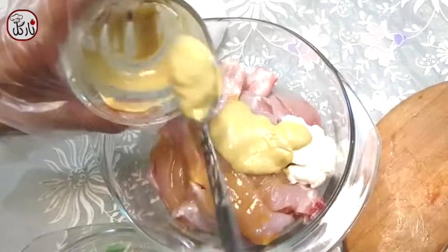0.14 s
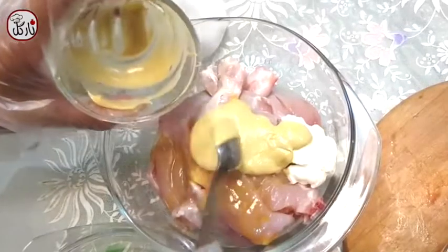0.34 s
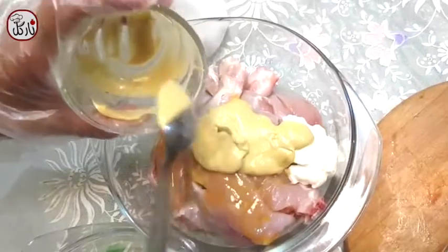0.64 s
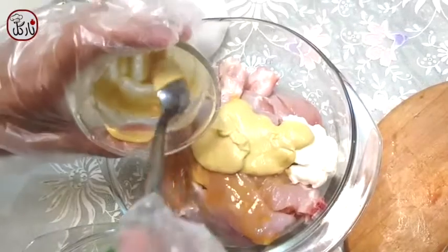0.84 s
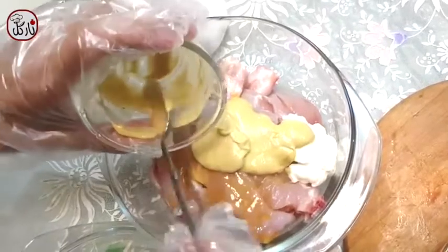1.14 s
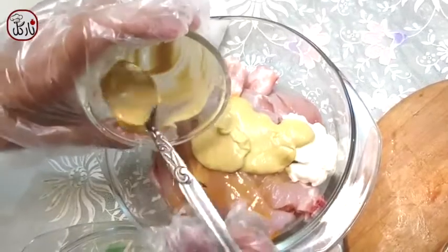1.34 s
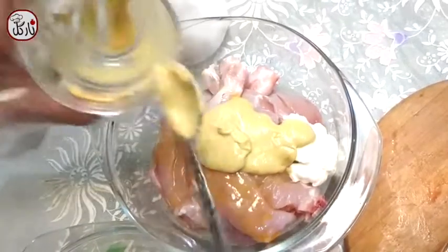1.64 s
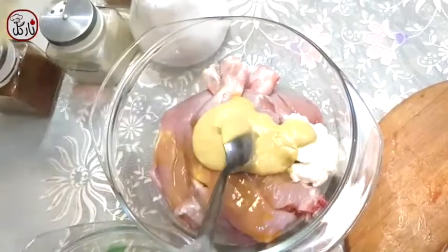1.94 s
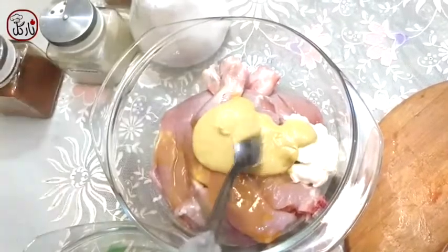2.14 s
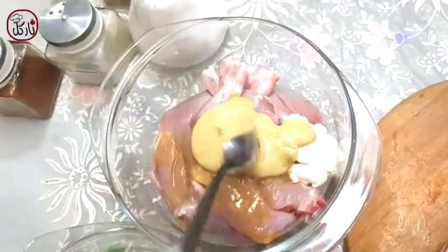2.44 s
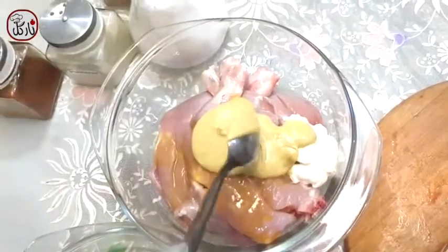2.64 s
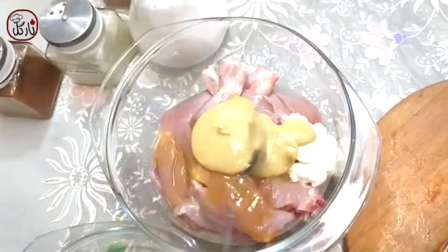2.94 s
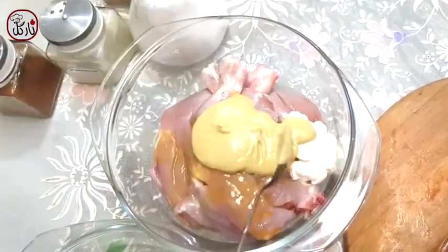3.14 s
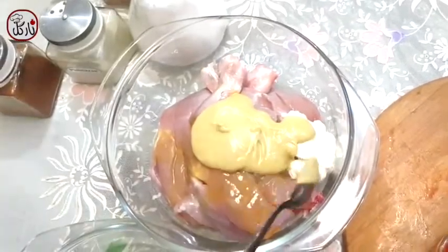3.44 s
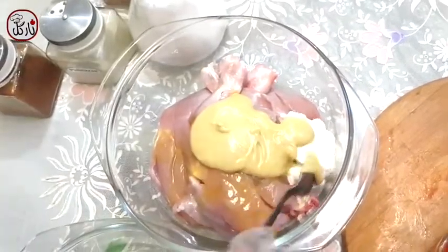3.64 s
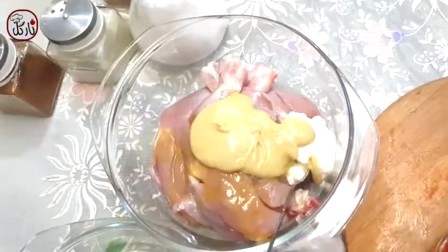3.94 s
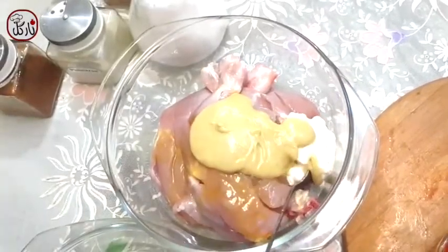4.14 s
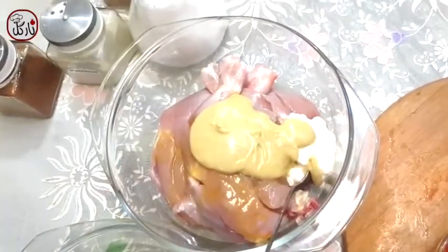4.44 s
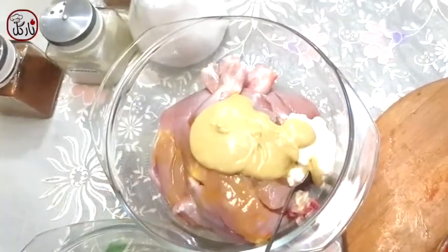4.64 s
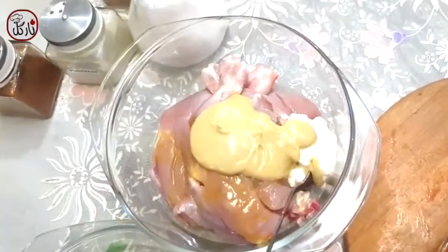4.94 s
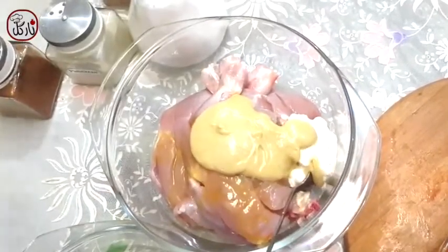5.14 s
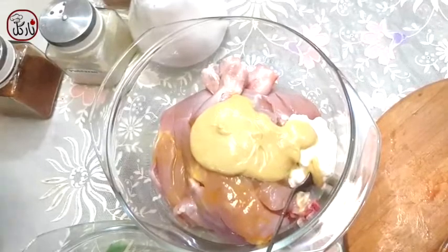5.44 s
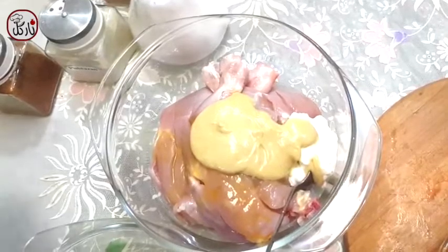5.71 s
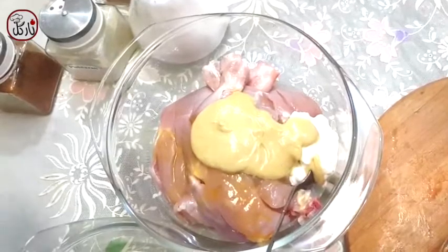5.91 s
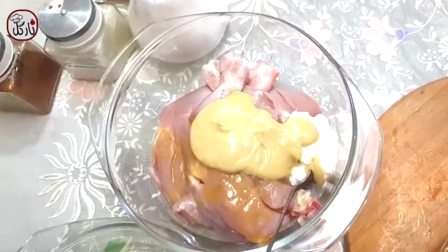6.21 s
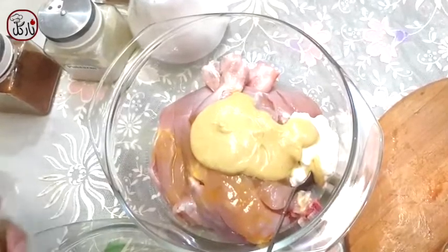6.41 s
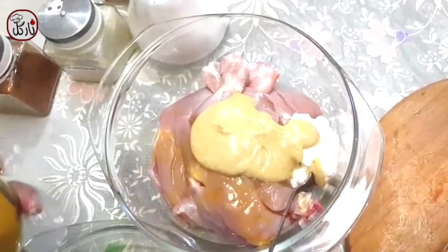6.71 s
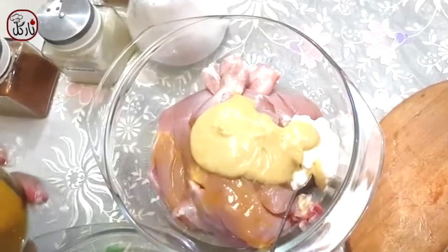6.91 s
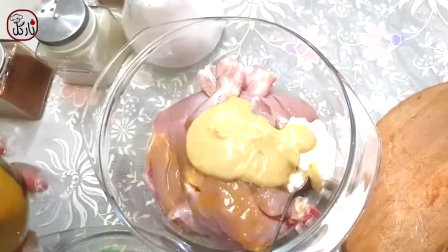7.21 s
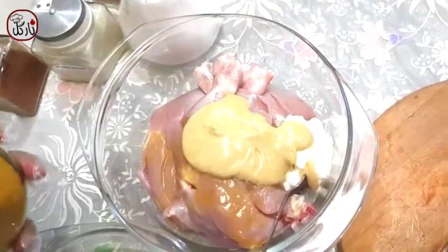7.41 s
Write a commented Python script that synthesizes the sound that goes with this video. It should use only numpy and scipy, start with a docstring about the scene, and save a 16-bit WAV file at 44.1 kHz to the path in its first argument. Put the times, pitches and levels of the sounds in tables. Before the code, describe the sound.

Thin plastic gloves crinkle and snap close up while a spoon scrapes a small glass cup and taps a bowl over faint kitchen hum.

```python
"""At a kitchen table, thin plastic gloves crinkle just above a phone: many tiny bursts of noise and louder snaps.
A spoon scrapes a small glass cup (uneven noise) and drops against the rim of a big bowl (ringing tones).
Glassware is set down with soft thuds and rattles. An appliance hums in the room: tones, low noise and faint air.
The phone's two ports hear differently: the left bright and early, the right dull, resonant and late."""
import sys
import numpy as np
from scipy import signal
from scipy.fft import rfft, irfft
from scipy.io import wavfile
from scipy.ndimage import uniform_filter1d

SR = 44100
rng = np.random.default_rng(int(sys.argv[2]) if len(sys.argv) > 2 else 0)


def store_wav(level_fs):
    """Save 16-bit WAV to argv[1]."""
    pcm = np.round(np.clip(np.atleast_2d(level_fs), -1, 1) * 32767)
    wavfile.write(sys.argv[1], SR, pcm.T.astype(np.int16))


N = 333652  # length in samples

# Single creases snapping. Each row: time in seconds, relative level in dB.
CREASE_SNAPS = [(0.093, -27), (0.15, -22), (0.259, -22.5), (0.488, -25), (0.916, -19), (0.946, -22),
                (0.982, -28), (1.162, -24), (1.18, -22.5), (1.211, -24), (1.254, -26), (1.5, -30),
                (1.874, -34), (1.923, -30), (2.245, -23.5), (2.288, -32), (2.312, -26), (2.356, -34),
                (2.441, -29), (2.845, -22), (2.934, -35), (2.951, -30), (2.975, -17), (2.982, -21),
                (3.155, -27), (3.182, -28.5), (3.288, -25), (3.471, -20.5), (3.48, -22), (3.508, -19.5),
                (3.619, -20.5), (3.964, -17), (4.055, -20.5), (4.192, -31), (4.249, -24), (4.338, -29),
                (4.599, -28.5), (4.964, -32), (5.011, -32), (5.103, -26.5), (5.16, -26), (5.174, -19.5),
                (5.207, -20), (5.228, -21), (5.292, -19), (5.387, -16), (5.452, -19), (5.457, -19),
                (5.478, -34.5), (5.597, -18), (5.886, -17), (5.923, -24), (6.108, -20), (6.339, -17),
                (6.369, -30), (6.442, -22), (6.501, -22.5), (6.815, -31), (6.917, -28), (7, -23),
                (7.33, -24.5), (7.5, -20), (7.52, -17)]
# Frequency bands of the plastic film. Each row: centre in Hz, relative level in dB.
FILM_BANDS = [(900, -12), (1600, -10), (2250, 0), (3300, 0.5), (4700, 7), (6600, 2.5), (9000, 5.5),
              (11800, 3), (14500, -1)]
# Hand movements that crumple the film. Each row: peak time in seconds, rise in seconds, fall in seconds,
# relative peak level in dB, lower bands against the top in dB.
HAND_MOVES = [(0.0, 0.12, 0.047, -49.5, -20), (0.243, 0.14, 0.044, -40, -8), (.5, 0.076, 0.069, -56, -13),
              (.77, 0.043, 0.045, -65, -12), (.9, 0.028, 0.069, -51, -3), (1.099, 0.12, 0.11, -44.5, -5),
              (1.286, 0.08, 0.083, -47.5, -8), (1.604, .11, 0.17, -39.5, -5),
              (1.939, 0.28, 0.034, -44.5, -5.5), (2.088, 0.23, 0.088, -45, -5),
              (2.331, 0.09, 0.023, -59.5, -2.5), (2.53, 0.018, 0.022, -55.5, -4),
              (2.617, 0.045, 0.24, -51, 2), (2.891, 0.13, 0.094, -44, -7), (3.17, 0.018, 0.064, -56, -0.5),
              (3.3, 0.11, 0.052, -67, 3.5), (3.42, 0.12, 0.01, -58, -34), (3.521, 0.036, 0.089, -47, -11),
              (3.688, 0.056, 0.055, -43.5, -1.5), (3.97, 0.19, 0.081, -38, -8),
              (4.253, 0.028, 0.064, -48, -4), (4.394, .1, 0.069, -47.5, -3), (4.472, 0.05, 0.1, -45.5, 0),
              (4.587, 0.043, 0.057, -52.5, 1), (4.96, 0.03, 0.019, -54, -9), (5.029, 0.032, 0.21, -63, -5),
              (5.211, 0.054, 0.06, -48.5, -9.5), (5.361, 0.067, 0.13, -40.5, -11.5),
              (5.467, 0.018, 0.098, -35, -7), (5.749, 0.23, 0.1, -40, -7),
              (5.91, 0.055, 0.17, -37.5, -10.5), (6.118, 0.47, 0.21, -39, -8),
              (6.36, 0.03, 0.043, -37.5, -8.5), (6.51, 0.043, 0.05, -43.5, -11),
              (6.65, 0.11, 0.13, -51, -5), (6.991, 0.084, 0.022, -39.5, -7.5),
              (7.029, 0.034, 0.065, -48, -3.5), (7.222, 0.038, 0.025, -42.5, -22),
              (7.332, 0.076, 0.13, -54.5, -8), (7.51, 0.053, 0.016, -54.5, -16)]
# Faint rustle between movements. Each row: time in seconds, relative level in dB, lower bands against top in dB.
IDLE_RUSTLE = [(0, -51, -21), (.6, -76.5, 1), (.85, -92, -11), (1.45, -58, -6.5), (2.4, -69.5, 0.5),
               (3.1, -62, -2.5), (4.15, -62, -7), (4.702, -58.5, 0), (4.9, -69, 6), (6.26, -55.5, -22),
               (6.325, -62, -5), (6.4, -50, -4.5), (6.85, -62, -4), (7.56, -69, -1)]
# Extra level of the film bands below BODY_TOP_HZ. Each row: time in seconds, level in dB.
BODY_LEVEL = [(0, -4), (.6, 3), (2.0, -2), (2.4, -12.5), (2.8, 0.5), (4.0, 3.5), (4.7, 0.5), (5.2, 2.5),
              (5.7, 1.5), (6.7, 4.5), (7.0, 2), (7.3, 8), (7.56, 3.5)]
# Small narrow ticks. Each row: time in seconds, relative level in dB, pitch in Hz.
SMALL_TICKS = [(0.4707, -46.5, 4840), (0.5751, -45.5, 5020), (.916, -23, 6380), (1.2286, -50, 5200),
               (1.464, -47, 4700), (1.865, -51.5, 2080), (2.95, -40, 5100), (3.154, -48.5, 4670),
               (3.304, -43.5, 5650), (3.5294, -45, 5000), (3.586, -36.5, 5770), (5.774, -35, 4800),
               (6.262, -33, 5160), (6.984, -41, 2330), (6.997, -37.5, 3570), (7.19, -34.5, 7200),
               (7.231, -40, 6440)]
# Spoon strokes on the cup. Each row: time in seconds, relative level in dB,
# time to fall 60 dB in seconds, treble tilt in dB per octave.
SPOON_SCRAPES = [(0.873, -56.5, 0.66, 11), (0.912, -45, 0.062, -3), (1.0214, -41, 0.16, -1),
                 (1.1118, -42, 0.04, 4), (1.261, -36, 0.036, 6), (1.267, -55, 0.19, 1),
                 (3.663, -41.5, 0.12, 3), (3.688, -45, 0.035, -6.5)]
# Resonances of the glass cup. Each row: centre in Hz, width in Hz, relative level in dB.
CUP_BANDS = [(1690, 600, 2), (2160, 200, 5), (3130, 370, 4), (4480, 780, 3.5), (6550, 690, -3.5)]
# Spoon blows on the bowl. Each row: time in seconds, relative level in dB.
BOWL_BLOWS = [(3.7103, -21.5)]
# Ringing tones of the bowl. Each row: pitch in Hz, relative level in dB, time to fall 60 dB in seconds.
BOWL_MODES = [(880, -7, 0.08), (1370, 2, 0.05), (1758, 5.5, 0.13), (2040, -4, 0.15), (2244, -0.5, 0.08),
              (3217, 9.5, 0.058), (3330, 7, 0.039), (3370, -4, 0.032), (4770, 2, 0.067), (4800, -6, 0.16),
              (4050, -8, 0.04), (6994, 3.5, 0.035)]
# Glass set down. Each row: time in seconds, relative level in dB, hardness from 0 to 1.
GLASS_KNOCKS = [(2.735, -27.5, 0.08), (3.688, -38, 0.13), (3.708, -44, 0.05), (5.471, -47.5, 0.27),
                (5.998, -47.5, 0.68), (6.336, -52.5, 0.74), (6.979, -48.5, 0.78), (7.368, -45.5, 0.18)]
# Ringing tones of the table. Each row: pitch in Hz, relative level in dB, time to fall 60 dB in seconds.
TABLE_MODES = [(373, 5, 0.018), (527, -13, 0.13), (287, -13, 0.096), (964, -7.5, 0.03)]
# Noise bands of the hum. Each row: centre in Hz, width in Hz, relative level in dB.
HUM_BANDS = [(120.9, 5.6, -7.5), (191, 56, -6.5), (277, 59, -6)]
# Slow level of the hum. Each row: time in seconds, level in dB.
HUM_LEVEL = [(0, -61.5), (3, -65.5), (6.2, -65), (7.57, -71.5)]
# A wandering drone. Each row: time in seconds, centre pitch in Hz, level in dB.
DRONE_PATH = [(0, 141.4, -63), (.7, 160.2, -60.5), (1.5, 137.5, -65.5), (2.8, 149.2, -61.5),
              (4.0, 155.7, -66), (5.7, 151.9, -64.5), (7.56, 140, -72.5)]
# Colour of the air noise. Each row: frequency in Hz, relative level in dB.
AIR_COLOUR = [(25, -19), (60, -6), (300, -3.5), (500, -10), (800, -24.5), (2000, -25), (6000, -68),
              (16000, -49)]
# Colour of each phone port. Each row: frequency in Hz, gain in dB.
LEFT_COLOUR = [(200, -2), (1200, 4.5), (2200, 1), (3000, 2.5), (5500, 2), (6800, 1), (8000, -6),
               (11500, 6.5), (13500, 6.5), (15500, 9)]
RIGHT_COLOUR = [(200, -3.5), (700, -2), (1400, 2.5), (2200, 6), (3000, -6), (4800, 6.5), (5200, -5.5),
                (6000, -15), (8000, -13), (12000, -7.5), (15500, -19.5)]

BODY_TOP_HZ, LOW_TOP_HZ = 3000, 6000  # tops of the film's body bands and of its lower bands
EDGE_DB, LOW_EDGE_DB = 14, 13  # drop one rise before or one fall after a peak: top and lower bands
ROUNDNESS = 2.31  # power of that slope
TICK_CYCLES, TICK_WIDTH = 93, 0.21  # cycles to fall 60 dB; band width as a share of the pitch
AIR_DB = -63
STEADY_HZ, STEADY_DB = 99, -73.5
DRONE_WIDTH_HZ = 18.4
PORT_LAG_S = 0.0003
ROOM_T60_S, ROOM_DB = .22, -15
TOP_HZ = 15900  # hardly anything passes above this


def gloves():
    """Creases buckle at random, more often the harder the hand moves; each pop is a short burst with its own colour."""
    time = np.arange(N) / SR
    coarse = time[::100]
    level_db, low_db = (np.interp(time, coarse, db) for db in effort(coarse))
    rate = np.clip(1600 * undb(0.54 * (level_db + 49.0)), 1050, 8000)  # pops a second
    pops = np.flatnonzero(rng.random(N) < rate / SR)
    size = undb(np.minimum(2.0 * rng.exponential(size=N), 9))[pops]
    # quieter pops where they crowd together, so the rate alone does not raise the level
    evening = np.sqrt(np.mean(rate) / rate[pops]) / np.sqrt(np.mean(size ** 2))
    body_db = np.interp(time, *np.transpose(BODY_LEVEL))
    snap_s, snap_db = np.transpose(CREASE_SNAPS)
    snap_low_db = np.interp(snap_s, time, low_db) - 30
    tint = rng.standard_normal((len(snap_s), len(FILM_BANDS)))  # each snap has its own colour
    out = 0
    for k, (hz, db) in enumerate(FILM_BANDS):
        low, body = hz < LOW_TOP_HZ, hz < BODY_TOP_HZ
        pop_tint_db = (4.5 if low else 6.5) * np.minimum(rng.standard_normal(N)[pops], 2)
        pop_size = size ** (1 if low else 1.6) * undb(pop_tint_db) * evening
        # bursts add as power: 9 ms is the time for the power to fall to a thousandth
        burst_power = swell(spikes(pops / SR, pop_size ** 2), .0005, .009)
        # other folds take over many times a second, so the colour keeps changing
        gain = undb(level_db + low * low_db + body * body_db + 3.27 * drift(30) - 4.0)
        crackle = unit(np.sqrt(np.abs(burst_power))) * gain
        crisp = spikes(pops / SR, pop_size)
        band_snap_db = snap_db + low * snap_low_db + 4.0 * tint[:, k] - 5.0 * (hz < 8000) - 13.0
        snap = spikes(snap_s, undb(band_snap_db))
        # the instant of buckling: bare spikes of random sign
        instant = undb(16.0) * snap + undb(10.0 - 8.6 * low) * crisp * gain
        flick = pair(instant) * np.sign(rng.standard_normal((2, N)))
        width = np.clip((0.36 if body else 0.51) * hz, 480, 3000)
        film = grit(hz, 2900) * (crackle + swell(snap, 0.0021, 0.014)) + flick
        out = out + undb(db) * band(film, hz, width) * np.sqrt(SR / 2 / width / len(FILM_BANDS))
    return out


def effort(time):
    """Rustle level of the top, and of the lower bands against it: movements swell and fade over the idle rustle."""
    idle_s, idle_db, idle_low_db = np.transpose(IDLE_RUSTLE)
    top = undb(2 * np.interp(time, idle_s, idle_db))  # doubled dB gives power
    low = undb(2 * np.interp(time, idle_s, idle_db + idle_low_db))
    for peak, rise, fall, db, low_db in HAND_MOVES:
        away = np.maximum((peak - time) / rise, (time - peak) / fall) ** ROUNDNESS
        top = top + undb(2 * (db - EDGE_DB * away))
        low = low + undb(2 * (db + low_db - LOW_EDGE_DB * away))
    return 10 * np.log10(top), 10 * np.log10(low / top)


def ticks():
    """Tiny ticks, each a short burst in a narrow band of its own; lower ones last longer."""
    out, noise = np.zeros((2, N)), grit(6700, 2000)
    for s, db, hz in SMALL_TICKS:
        start, width = int(s * SR), TICK_WIDTH * hz
        span = slice(start, start + SR // 10)
        burst = swell(spikes([0], [undb(db)]), 0.002, TICK_CYCLES / hz)[:SR // 10]
        out[:, span] += band(burst * noise[:, span], hz, width) * np.sqrt(SR / 2 / width)
    return out


def spoon():
    """Steel chatters on the paste-damped cup, then strikes the bowl and rattles briefly on its rim."""
    strokes = np.array([swell(spikes([s], [undb(db)]), 0.0041, t60) for s, db, t60, _ in SPOON_SCRAPES])
    tilt = np.array(SPOON_SCRAPES)[:, 3]
    slip = undb(2.9 * drift(250))  # the edge sticks and slips
    cup = 0
    for hz, width, db in CUP_BANDS:
        chatter = grit(hz, 1700) * slip
        flutter = undb(1.8 * drift(45))  # each resonance wavers by itself
        strength = undb(db + 6.5 + tilt * np.log2(hz / BODY_TOP_HZ)) @ strokes
        cup = cup + band(chatter * flutter * strength, hz, width)
    s, db = np.transpose(BOWL_BLOWS)
    blow = spikes(s, undb(db))
    tick = undb(-7.0) * band(fade(blow, 0.053) * grit(3500, 2000), 2700, 4600)
    rattle = undb(-32.5) * fade(blow, 0.16) * rng.standard_normal(N)
    bowl = undb(-19.5) * pair(ring(blow + rattle, BOWL_MODES))
    return cup + tick + bowl


def knocks():
    """Glass meets the table; a harder contact is a shorter push with more rattle."""
    push, rattle = 0, 0
    for s, db, hardness in GLASS_KNOCKS:
        hard = np.clip(hardness, 0, 1)
        blow = spikes([s], [undb(db - 3.0)])
        soft = np.exp(-2 * np.pi * 600 * 4 ** hard / SR)  # smoothing from 600 Hz up to 2400 Hz
        push = push + (1 - hard) * signal.lfilter([1 - soft], [1, -soft], blow)
        rattle = rattle + hard * blow
    thud = band(band(pair(ring(push, TABLE_MODES)), 1036, 1560), 890, 1530)
    clatter = undb(13.5) * band(swell(rattle, 0.0015, 0.32) * grit(710, 3400), 640, 650)
    return thud + clatter


def kitchen():
    """A tone of steady pitch, a wandering drone and a wavering hum in the low room resonances over faint air noise."""
    time = np.arange(N) / SR
    air = np.array([colour(x, AIR_COLOUR) for x in grit(690, 1070, near=False)])
    out = undb(AIR_DB) * air * np.sqrt(SR / 2 / 500)
    for hz, width, db in HUM_BANDS:
        wave_db = np.interp(time, *np.transpose(HUM_LEVEL)) + 2.0 * drift(2.204)
        out = out + undb(db + wave_db) * unit(band(grit(hz, 1400, near=False), hz, width))
    s, hz, db = np.transpose(DRONE_PATH)
    # slow noise on a sine and a cosine blurs the drone into a narrow band
    slow = signal.butter(2, DRONE_WIDTH_HZ / 2, fs=SR, output="sos")
    waver = signal.sosfilt(slow, rng.standard_normal((2, N)))
    turn = 2 * np.pi * np.cumsum(np.interp(time, s, hz)) / SR
    blurred = unit(waver[0] * np.cos(turn) + waver[1] * np.sin(turn))
    drone = undb(np.interp(time, s, db)) * blurred
    tone = undb(STEADY_DB + 1.8 * drift(5)) * np.sqrt(2) * np.sin(2 * np.pi * STEADY_HZ * time)
    return out + drone + tone


def undb(db):
    """Decibels to gain."""
    return 10 ** (np.asarray(db) / 20)


def unit(x):
    """Scale to an average (rms) level of 1."""
    return x / np.sqrt(np.mean(x ** 2))


def colour(x, points):
    """Filter with the gain of the (Hz, dB) points, built from the cepstrum so nothing sounds before its cause."""
    hz, db = np.transpose(points)
    grid = np.maximum(np.linspace(0, SR / 2, 2049), 1)
    log_gain = np.interp(np.log(grid), np.log(hz), db) * np.log(10) / 20
    cepstrum = irfft(log_gain)
    cepstrum[1:2048] *= 2  # fold the backward half onto the forward half
    cepstrum[2049:] = 0
    return signal.oaconvolve(x, irfft(np.exp(rfft(cepstrum))))[:N]


def band(x, hz, width):
    """Keep a band of the given width around hz."""
    edges = np.clip([hz - width / 2, hz + width / 2], 10, .49 * SR)
    return signal.sosfilt(signal.butter(2, edges, "bandpass", fs=SR, output="sos"), x)


def spikes(s, size):
    """One sample of the given size at each time in seconds."""
    return np.bincount(np.clip(np.asarray(s) * SR, 0, N - 1).astype(int), size, N)


def fade(x, t60):
    """Every spike dies away exponentially, to a thousandth in t60 seconds."""
    keep = 1000 ** (-1 / (max(t60, 1e-4) * SR))
    return signal.lfilter([1], [1, -keep], x)


def swell(x, rise, t60):
    """Spikes that build up over rise seconds before they die away."""
    size = max(int(rise * SR), 1)
    hump = np.hanning(size + 2)[1:-1] * 2 / (size + 1)
    return signal.oaconvolve(fade(x, t60), hump)[:N]


def drift(rate):
    """Random levels held 1 / rate seconds, with smooth slides between; spread near 1."""
    size = int(SR / rate)
    held = np.repeat(rng.standard_normal(N // size + 1), size)
    return 1.25 * uniform_filter1d(held, size)[:N]


def ring(push, modes):
    """Decaying tones set going by a push."""
    out = 0
    for hz, db, t60 in modes:
        pole = np.exp(2j * np.pi * hz / SR - np.log(1000) / (t60 * SR))
        out = out + undb(db) * signal.lfilter([1], [1, -pole], push).imag
    return out


def pair(x):
    """The right port is further from the hands, so it hears the sound later."""
    lag = int(PORT_LAG_S * SR)
    return np.array([x, np.concatenate([np.zeros(lag), x[:N - lag]])])


def grit(hz, alike_hz, near=True):
    """Noise for both ports, less alike the higher hz is against alike_hz; far sound reaches both at once."""
    shared, own = rng.standard_normal(N), rng.standard_normal(N)
    like = 1 / (1 + (hz / alike_hz) ** 2)
    both = pair(shared) if near else np.array([shared, shared])
    return both * [[1], [like]] + np.sqrt(1 - like ** 2) * own * [[0], [1]]


def scene():
    """Close sounds with a short room tail of fading noise, over the hum."""
    near = gloves() + ticks() + spoon() + knocks()
    tail = rng.standard_normal((2, SR // 2)) * 1000 ** (-np.arange(SR // 2) / SR / ROOM_T60_S)
    tail = signal.lfilter([1], [1, -.5], tail)  # the walls swallow treble
    tail[:, :SR // 200] = 0  # no echo in the first 5 ms
    tail /= np.sqrt(np.sum(tail[0] ** 2))
    room = undb(ROOM_DB) * signal.oaconvolve(near, tail, axes=1)[:, :N]
    return near + room + kitchen()


def record(dry):
    """Each port colours the sound in its own way; the top is cut."""
    ports = np.array([colour(dry[0], LEFT_COLOUR), colour(dry[1], RIGHT_COLOUR)])
    return signal.sosfilt(signal.ellip(10, .2, 60, TOP_HZ, fs=SR, output="sos"), ports)


dry = scene()
out = record(dry)
store_wav(out)
```